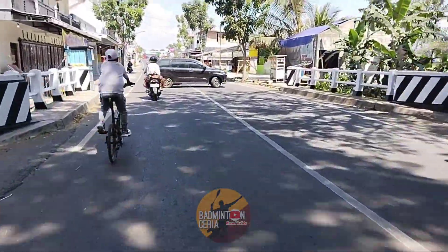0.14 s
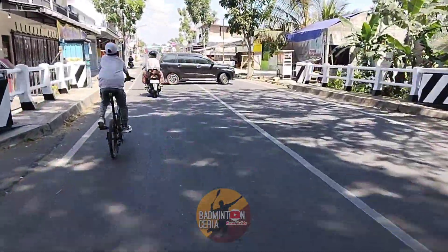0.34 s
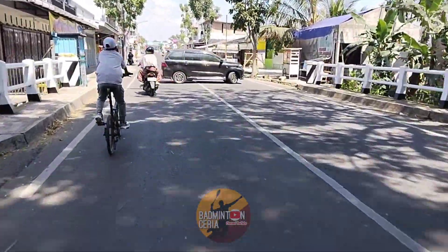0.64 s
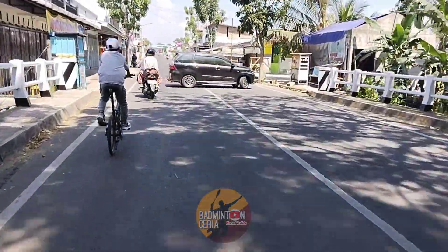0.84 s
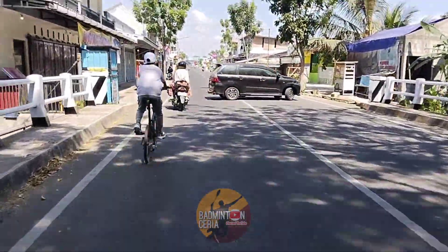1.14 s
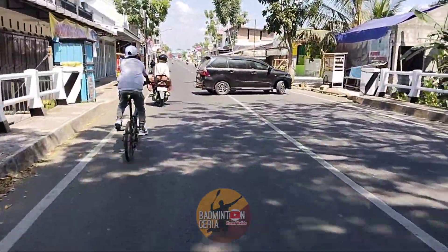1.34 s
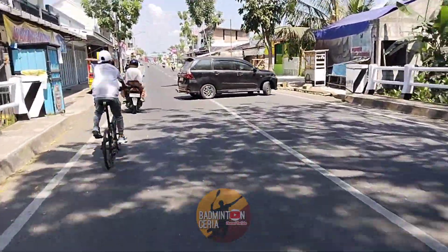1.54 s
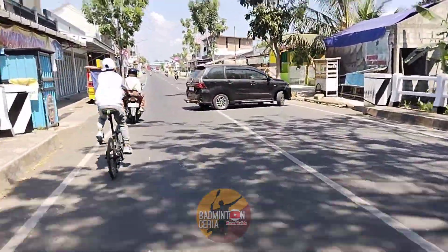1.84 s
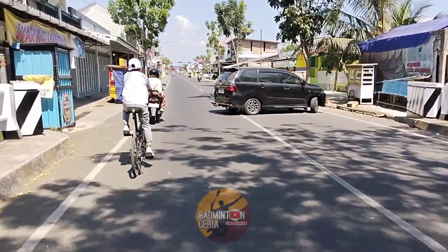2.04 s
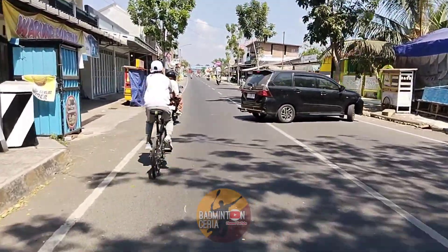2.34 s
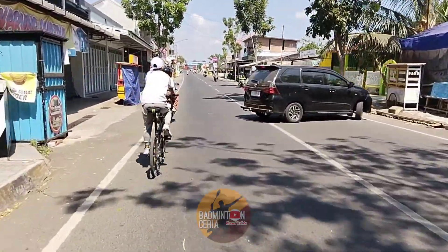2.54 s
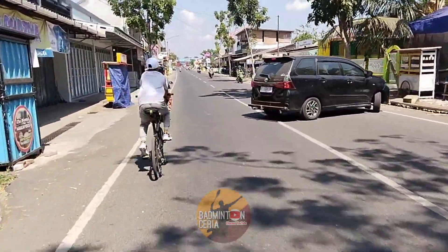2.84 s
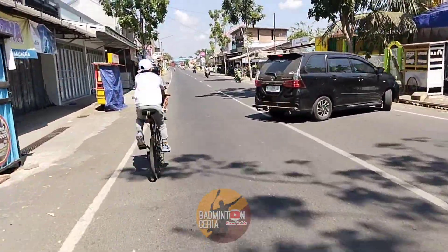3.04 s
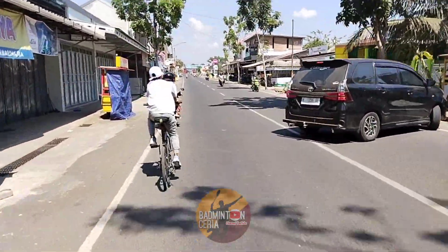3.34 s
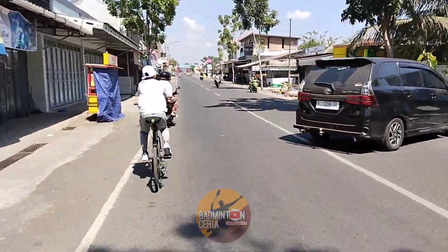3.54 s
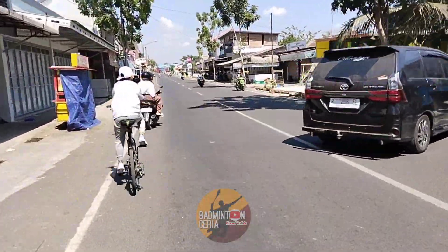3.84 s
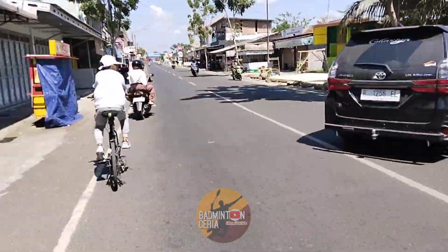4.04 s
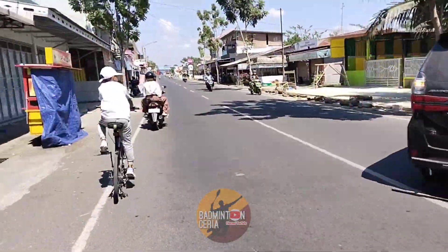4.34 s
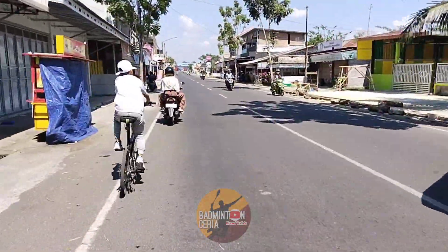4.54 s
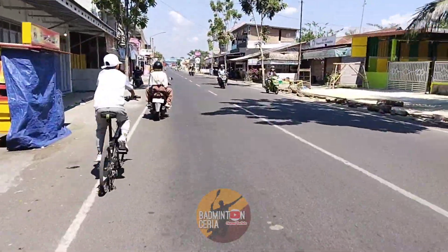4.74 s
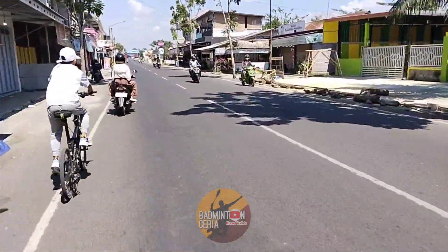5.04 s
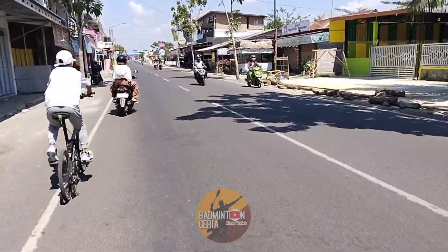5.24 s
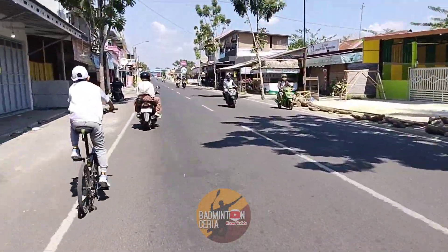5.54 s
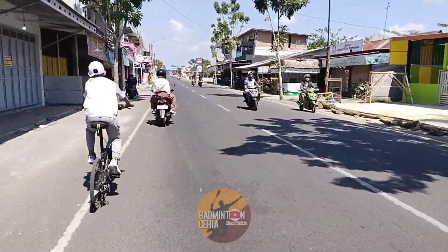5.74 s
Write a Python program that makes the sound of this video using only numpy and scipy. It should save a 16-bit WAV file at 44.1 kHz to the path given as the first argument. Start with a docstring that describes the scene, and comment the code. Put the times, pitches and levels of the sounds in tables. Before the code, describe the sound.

A bicycle bell is flicked seven times, clicking and pinging with a wavering high hum, over low gusty wind and murky street traffic.

```python
"""Wind on the microphone, traffic and a passing motorbike are heard first, all made of coloured noise.
Then a bicycle bell is flicked seven times while riding along a town street. Each flick gives a click,
a short piercing ping and a long beating hum, made of dying sines, pairs of waves and grainy noise.
Faint clinks, loose rattles and a dry tick join in; a bass cut, noise suppressor and band limit finish it."""
import sys
import numpy as np
from scipy import signal
from scipy.fft import rfft, irfft
from scipy.io import wavfile
from scipy.ndimage import uniform_filter1d

SR = 44100
rng = np.random.default_rng(int(sys.argv[2]) if len(sys.argv) > 2 else 0)


def put_to_file(sound):
    """Save the sound as 16-bit audio at rate SR, in the file named by the first command-line argument."""
    columns = np.atleast_2d(sound).T  # one column per channel
    safe = np.clip(columns, -1, 1)
    whole_steps = np.round(safe * 32767)
    wavfile.write(sys.argv[1], SR, whole_steps.astype(np.int16))


N = 260631
TIME = np.arange(N) / SR


def amp(db):
    """Turns decibels into gain."""
    return 10 ** (np.asarray(db) / 20)


def unit(x):
    """Scales a signal to an rms of one."""
    return x / np.sqrt(np.mean(x ** 2) + 1e-20)


def curve(rows, axis=1):
    """Reads one column of a time table at every sample, with straight lines between rows."""
    rows = np.asarray(rows)
    return np.interp(TIME, rows[:, 0], rows[:, axis])


def colour(points, hz):
    """Gain of a spectrum at the given frequencies."""
    point_hz, point_db = np.transpose(points)
    return amp(np.interp(np.log(hz + 1), np.log(point_hz), point_db))


def add(mix, s, sound):
    """Mixes a sound in at time s."""
    part = mix[round(s * SR):][:len(sound)]
    part += sound[:len(part)]


def drift(rate_hz):
    """A random wander of unit rms; a higher rate makes it faster."""
    step = 16  # worked out at every 16th sample, then joined by lines
    count = N // step + 2
    hz = np.fft.rfftfreq(count, step / SR)
    spectrum = rfft(rng.standard_normal(count)) * np.exp(-(hz / rate_hz) ** 2)
    slow = irfft(spectrum, count)
    return unit(np.interp(np.arange(N) / step, np.arange(count), slow))


def noise(points, patchy_db=0, size=1024):
    """Coloured noise whose level varies in small patches of time and pitch."""
    hop = size // 4
    hz = np.fft.rfftfreq(size, 1 / SR)
    real, imaginary, patches = rng.standard_normal((3, N // hop + 5, len(hz)))
    patches = uniform_filter1d(patches, size=13, axis=0)
    patches = unit(uniform_filter1d(patches, size=5, axis=1))
    patch_gain = amp(patchy_db * np.minimum(patches, 1.3))
    bins = (real + 1j * imaginary) * colour(points, hz) * patch_gain
    return unit(signal.istft(bins.T, nperseg=size, noverlap=size - hop)[1][:N])


def impulse(points, size=2048):
    """A click of peak one with the given spectrum, with no sound before its start."""
    log_gain = np.log(colour(points, abs(np.fft.fftfreq(size, 1 / SR))))
    # the Hilbert transform finds the phase that packs the energy early
    click = np.fft.ifft(np.exp(np.conj(signal.hilbert(log_gain)))).real
    return click / abs(click).max()


def mode(t, hz, t60, rise):
    """A sine with a soft start (rise in s) that dies by 60 dB in t60 seconds."""
    tone = np.sin(2 * np.pi * (hz * t + rng.random()))
    return tone * amp(-60 * t / t60) * (1 - np.exp(-t / rise))


def steady(x, size=4000):
    """Takes the slow swells out of a noise, so that one control can set its level."""
    return x / np.sqrt(uniform_filter1d(x ** 2, size=size) + 1e-9)


def fuzzy(hz, spread_hz):
    """A tone smeared over a narrow band by two random wanders."""
    phase = 2 * np.pi * np.cumsum(hz * np.ones(N)) / SR
    return unit(drift(spread_hz) * np.cos(phase) + drift(spread_hz) * np.sin(phase))


# slow rise and fall of the wind, before a shared trim: (time [s], level [dB])
BREEZE = [(0, -55.5), (.4, -41.5), (.65, -46.5), (1.0, -37.5), (1.35, -46.5), (1.7, -45.5), (2.1, -60.5),
          (2.3, -54), (2.7, -65), (3.3, -49), (3.5, -34.5), (3.85, -43.5), (4.55, -45), (4.85, -48),
          (5.05, -39), (5.91, -48)]
# single gusts that stand out of it, before the same trim: (time [s], level [dB], half length [s])
GUSTS = [(0.156, -42, 0.017), (0.345, -33, 0.045), (0.485, -37, 0.037), (0.853, -46, 0.031),
         (1.015, -55, 0.012), (1.144, -39.5, 0.027), (1.502, -40, 0.046), (2.186, -37, 0.028),
         (3.06, -44, 0.017), (3.449, -36.5, 0.021), (3.517, -40, 0.0051), (3.919, -35.5, 0.0092),
         (4.133, -35.5, 0.0068), (4.666, -33.5, 0.025), (4.861, -30, 0.082), (5.175, -35, 0.018),
         (5.361, -34.5, 0.015)]
# colour of the wind on the microphone: (pitch [Hz], gain [dB])
WIND = [(20, -36), (40, -32.5), (62, -43.5), (90, -11.5), (135, 16), (180, 2.5), (230, -18.5), (330, -47.5),
        (480, -42), (700, -52), (1200, -80.5)]
# thumps where gusts hit the microphone, before shaping: (time [s], level [dB], pitch [Hz])
BUFFETS = [(.985, -32, 231), (3.655, -39.5, 281), (4.655, -38, 365), (4.845, -24, 150), (4.86, -29.5, 440),
           (4.876, -35, 290), (5.31, -41, 337)]


def wind():
    """Eddies rumble on the microphone; stronger gusts reach higher, and some land in thumps."""
    power = amp(curve(BREEZE)) ** 2
    for s, db, half_s in GUSTS:
        power = power + amp(db) ** 2 * np.exp(-((TIME - s) / half_s) ** 2)
    gust_db = 10 * np.log10(power)
    low = steady(noise(WIND, patchy_db=0.0), size=2000)
    out = amp(gust_db - 3.5) * low * amp(3.36 * drift(rate_hz=31))
    eddies = steady(noise([(120, -24), (260, 24), (420, 5.5), (540, 8.5), (800, -63.5)], patchy_db=2.5))
    # the higher eddies grow 2.78 dB for each dB of wind
    out += amp(-63.5 + 2.78 * (gust_db + 39.0)) * eddies
    t = np.arange(SR // 10) / SR
    for s, db, hz in BUFFETS:
        swell = np.exp(-(t * hz / 3.5) ** 2) * (1 - np.exp(-(t * hz) ** 2))
        add(out, s, amp(db) * np.sin(2 * np.pi * hz * t) * swell)
    return out


# low rumble of the road: (pitch [Hz], gain [dB])
RUMBLE = [(20, 10.5), (45, 0), (90, -9.5), (160, -10), (400, -28), (900, -55)]
RUMBLE_DB = -65


def rumble():
    """The road rumbles faintly and without pause under the lulls in the wind."""
    return amp(RUMBLE_DB) * noise(RUMBLE, patchy_db=-0.5, size=2048)


# the passing motorbike: (time [s], exhaust level [dB], tyre level [dB])
PASS = [(0, -57, -61), (.25, -52, -63.5), (.4, -47.5, -68), (.6, -46.5, -60.5), (.74, -50, -55),
        (.9, -73, -56.5), (1.08, -70, -61), (1.2, -83, -72), (1.7, -90, -83.5), (2.3, -110, -110)]
# colour of its exhaust: (pitch [Hz], gain [dB])
EXHAUST = [(70, -54), (250, -6), (450, -16), (600, -3.5), (800, 4), (1100, 8), (1700, 6), (2050, -0.5),
           (2400, -9), (3300, -8), (4200, -11), (5200, -21.5), (7000, -36.5), (9600, -15.5), (11400, -39),
           (15500, -36)]
# colour of its tyres: (pitch [Hz], gain [dB])
TYRES = [(700, -35.5), (1300, 3.5), (2100, -2.5), (2500, -8), (3100, 1), (4200, -13.5), (5500, -22),
         (9500, -18), (15000, -25.5)]
FIRING_HZ = 91  # middle of the engine's wavering pulse rate
# echo off the road: when the bike is nearest, half length of the pass, longest delay, strength 0-1
NEAREST_S, PASS_HALF_S, GROUND_DELAY_S, GROUND_ECHO = .52, 0.53, 0.001112, 0.16


def motorbike():
    """Pulsing exhaust noise swells and drops away, tyre hiss follows; a road echo sweeps through both."""
    turns = np.cumsum(FIRING_HZ * (1 + .06 * drift(rate_hz=20))) / SR
    firing = unit(1.2 + np.exp(-(turns % 1) / .3))
    exhaust = amp(curve(PASS)) * firing * steady(noise(EXHAUST, patchy_db=4, size=1024))
    tyres = amp(curve(PASS, axis=2)) * noise(TYRES, patchy_db=5)
    direct = (exhaust + tyres) * amp(0.69 * drift(rate_hz=7.3))
    delay_s = GROUND_DELAY_S / np.hypot(1, (TIME - NEAREST_S) / PASS_HALF_S)
    return direct + GROUND_ECHO * np.interp(TIME - delay_s, TIME, direct)


WHINE_WAVER_HZ = 14  # rms wander of the pitch


def whine(s, half_s, hz, glide_hz_per_s, spread_hz, db):
    """A smeared, wavering tone that swells and fades as its vehicle goes by."""
    since = TIME - s
    glide = glide_hz_per_s * np.clip(since, -2 * half_s, 2 * half_s)
    pitch = hz + glide + WHINE_WAVER_HZ * drift(rate_hz=8.56)
    swell = amp(db + 3.3 * drift(rate_hz=14)) / (1 + (since / half_s) ** 2 / 2) ** 2
    return swell * steady(fuzzy(pitch, spread_hz), size=3000)


# traffic further off, before trims: (time [s], lower band level [dB], upper band level [dB])
TRAFFIC = [(1.1, -70.5, -80), (1.5, -62.5, -85), (1.85, -68, -74.5), (2.1, -65.5, -69), (2.6, -63.5, -72.5),
           (2.8, -58.5, -73.5), (2.93, -70, -75.5), (3.07, -55, -76.5), (3.18, -52, -71.5),
           (3.6, -56.5, -64), (3.72, -52, -62.5), (3.85, -57, -63), (4.1, -48.5, -64.5), (4.19, -64.5, -64),
           (4.3, -54, -52.5), (4.5, -52, -56.5), (4.88, -72, -66.5), (5.0, -59, -59.5), (5.15, -51, -56.5),
           (5.5, -59, -52.5), (5.65, -80.5, -47.5), (5.91, -59.5, -54.5)]
# colour of the lower band: (pitch [Hz], gain [dB])
TRAFFIC_LOW = [(200, -33), (380, -6.5), (520, -7.5), (660, -1), (810, -11.5), (1000, -8), (1200, 3),
               (1380, -10), (1700, -76)]
# colour of the upper band: (pitch [Hz], gain [dB])
TRAFFIC_HIGH = [(1100, -6), (1420, 0.5), (1650, 0.5), (2050, -9), (2600, -22), (3100, -10.5), (4000, -16.5),
                (5200, -63)]
# whines and drones of vehicles that come and go:
# (loudest at [s], half length [s], pitch [Hz], glide [Hz per s], spread [Hz], level [dB])
WHINES = [(0.14, .52, 1173, -200, 40, -61.5), (1.775, .07, 641, -380, 29.8, -60),
          (3.003, .04, 479, -200, 44.7, -61), (3.132, .09, 376, -60, 22, -54.5),
          (3.415, .04, 664, -300, 44.5, -57), (3.54, .08, 1093, -100, 34.8, -61),
          (3.8, .06, 395, -1, 41.8, -56), (3.907, .17, 1165, 59.5, 35, -55.5),
          (4.543, .42, 1626, -39.5, 29.5, -60.5), (5.038, .05, 435, 103.5, 55, -51.5),
          (5.051, .11, 1222, -200, 35, -57), (5.308, .05, 522, 302, 70, -61.5),
          (5.443, .44, 1664, -1, 24, -58.5)]
# fine tyre hiss, before a trim: (time [s], level [dB])
HISS_LEVEL = [(0, -60), (.75, -60.5), (1.2, -68.5), (2.1, -69), (3, -64), (4.9, -69), (5.6, -61.5),
              (5.9, -66.5)]
# its colour: (pitch [Hz], gain [dB])
HISS = [(2500, -42.5), (4200, -39.5), (5200, -17), (6400, -4.5), (8000, -1.5), (9600, 5), (10700, 1),
        (12300, -9), (15300, -8)]


def street():
    """Two bands of patchy noise make murky traffic, with wavering whines and a fine hiss above."""
    low = steady(noise(TRAFFIC_LOW, patchy_db=6.5, size=2048))
    low = amp(curve(TRAFFIC) - 4.0) * low * amp(2.2 * drift(rate_hz=8))
    high = steady(noise(TRAFFIC_HIGH, patchy_db=7, size=2048))
    high = amp(curve(TRAFFIC, axis=2) - 4.5) * high * amp(1.9 * drift(rate_hz=9.9))
    tones = sum(whine(*row) for row in WHINES)
    hiss = amp(curve(HISS_LEVEL) - 3.5) * noise(HISS, patchy_db=4, size=2048)
    return low + high + tones + hiss


# faint, distant clinks: (time [s], level [dB], pitch [Hz])
CLINKS = [(1.974, -45.5, 1237), (2.06, -50, 1840)]
CLINK_T60 = 0.067  # s to fall by 60 dB


def clinks():
    """Small things knock and ring briefly somewhere down the street, each as one dying sine."""
    t, out = np.arange(SR // 3) / SR, np.zeros(N)
    for s, db, hz in CLINKS:
        add(out, s, amp(db) * mode(t, hz, CLINK_T60, rise=0.0048))
    return out


# time the bounces last, and the greatest strength of one against the first blow
CHATTER_S, BOUNCE = .012, 0.35


def chatter(count=4):
    """The striker lands, then bounces a few times at uneven moments."""
    contacts = np.zeros(SR // 20)
    contacts[0] = 1
    for when, size in rng.random((count, 2)):
        bounce = BOUNCE * (.5 + size / 2) * rng.choice([-1, 1])
        add(contacts, when * CHATTER_S, np.array([bounce]))
    return contacts


# short modes of the housing and lever, varied each time: (pitch [Hz], level [dB], time to fall 60 dB [s])
HOUSING = [(970, -5, 0.024), (1430, 1, 0.047), (1740, -7, 0.02), (2157, -4.5, 0.062), (2890, -7, 0.069),
           (3253, 1, 0.032), (4400, -6, 0.054), (4620, -12, .11), (5280, -13, .035)]


def housing(t):
    """The short modes of the housing, stirred a little differently each time."""
    out = np.zeros(len(t))
    for hz, db, t60 in HOUSING:
        strength = amp(db + 2.5 * rng.standard_normal())
        out += strength * mode(t, hz * rng.uniform(.99, 1.01), t60, rise=.0004)
    return out


PING_HZ = 9455


def ping(t, beat_s, return_s, second_db, swell_s=0.0072, fall_s=0.06):
    """The piercing mode holds for one beat, sinks, and swells back once, a little off pitch."""
    first = np.maximum(1 - (t / beat_s) ** 4, 0) * np.exp(-t / fall_s) * 1.1
    u = np.maximum(t - return_s, 0) / swell_s
    second = amp(second_db) * u * np.exp(1 - u)
    second_hz = PING_HZ + rng.uniform(-8, 8)
    return first * np.sin(2 * np.pi * PING_HZ * t) + second * np.cos(2 * np.pi * second_hz * t)


# one row a flick: (time [s], click level [dB], ping level [dB], length of the ping's first beat [s],
# start of its second beat [s], second beat against the ping [dB], top mode level [dB], thump level [dB],
# thump pitch [Hz], thump lag [s], thump half length [s], crackle level [dB], clatter level [dB])
FLICKS = [(2.2399, -20.5, -25, 0.025, 0.021, -6, -49, -32.5, 696, .0071, .0027, -44.5, -52.5),
          (2.5653, -22, -21.5, 0.013, 0.0089, -8.5, -42, -30, 679, .0060, .0028, -55, -52.5),
          (2.8557, -37.5, -24, 0.01, 0.021, -13, -45.5, -35, 520, 0.0019, 0.0023, -72, -51.5),
          (3.229, -21, -20, .008, .009, -8.5, -55, -31, 772, .0016, .0017, -52, -47),
          (3.6377, -27, -21, .014, .009, -19, -57, -35.5, 649, .0031, .0025, -52, -50),
          (4.1297, -22, -26.5, 0.014, 0.014, 2, -35, -34.5, 671, 0.0077, 0.0049, -52, -48.5),
          (5.3905, -28, -26, 0.011, 0.0089, -4.5, -40, -33.5, 420, 0.00107, 0.0024, -48.5, -50)]
# faint clicks just before or after a flick: (time [s], level [dB])
FAINT_CLICKS = [(2.2369, -34.5), (2.575, -37), (4.126, -36.5), (4.158, -42.5)]
# colour of the striker's click: (pitch [Hz], gain [dB])
CLICK = [(150, -21), (600, 8), (1400, -18.5), (2600, -19), (4500, -7), (6000, -14.5), (8000, 5.5),
         (9400, 8.5), (11000, 0.5), (13000, 7), (15000, -2), (15800, -11.5)]
# colour of the striker's buzz on the dome: (pitch [Hz], gain [dB])
RATTLE = [(1500, -18.5), (2600, -15), (4500, -20.5), (6000, -26), (8200, -9.5), (9400, 13.5), (10300, -5.5),
          (11500, -18.5), (15000, -10)]
# colour of the street's answer: (pitch [Hz], gain [dB])
ECHO = [(3000, -20), (4000, -26.5), (4550, -24), (5200, -29.5), (7000, -34.5), (9000, -16.5), (9400, -1),
        (9650, 6), (9900, -19.5), (11000, -35.5), (14200, -22.5), (14950, -25), (15400, -43.5)]
# colour of the rough crackle under each ping: (pitch [Hz], gain [dB])
CRACKLE = [(200, -3.5), (420, -5.5), (900, 17.5), (1450, 12), (1850, -22), (2500, -18), (3800, -11),
           (4500, -3), (5600, -28), (8000, -28)]
CRACKLE_S = 0.013  # length of its strong part
TOP_HZ, MIDDLE_HZ = 14640, 7148
MIDDLE_DB = -20  # against the crackle level
BOUNCE_CLICK_DB = -23.5  # against the click level


def flicks():
    """The striker clicks and chatters, high modes flash up and the housing clatters.
    Under each ping lie a low thump and rough crackle, as of an overloaded microphone."""
    t, out = np.arange(SR) / SR, np.zeros(N)
    buzzing, echoing, crackling = np.zeros((3, N))
    click, short = impulse(CLICK), t[:SR // 5]
    for (s, click_db, ping_db, beat_s, return_s, second_db, top_db,
         thump_db, thump_hz, thump_lag_s, thump_s, crackle_db, clatter_db) in FLICKS:
        contacts = chatter()
        add(out, s, amp(click_db) * click)
        add(out, s, amp(click_db + BOUNCE_CLICK_DB) * signal.fftconvolve(contacts, click))
        add(out, s, amp(clatter_db) * signal.fftconvolve(contacts, housing(short)))
        add(out, s, amp(ping_db) * ping(t, beat_s, return_s, second_db))
        add(out, s, amp(top_db) * mode(t, TOP_HZ, t60=.2, rise=.014))
        add(out, s, amp(crackle_db + MIDDLE_DB) * mode(t, MIDDLE_HZ, t60=.9, rise=.001))
        thump_swell = np.exp(-((t - thump_lag_s) / thump_s) ** 2)
        add(out, s, amp(thump_db) * thump_swell * np.sin(2 * np.pi * thump_hz * t))
        add(out, s, amp(thump_db - 25) * mode(t, thump_hz, t60=.2, rise=.005))
        # the crackle holds briefly and leaves a faint tail
        crackle = np.exp(-(t / CRACKLE_S) ** 6) + amp(-20) * np.exp(-t / .025)
        add(crackling, s, amp(crackle_db) * crackle)
        # the striker buzzes against the dome for about as long as the ping's first beat, then fades
        contact = np.exp(-(t / (beat_s + 0.012)) ** 2) + amp(second_db) * np.exp(-t / 0.019)
        add(buzzing, s, amp(-40.5) * contact + amp(click_db - 2.5) * np.exp(-t / 0.00019))
        echo = np.exp(-t / 0.075) * (1 - np.exp(-t / 0.0028))
        add(echoing, s, amp(-50.5 + 0.39 * (second_db + 10.0)) * echo)
    for s, db in FAINT_CLICKS:
        add(out, s, amp(db) * click)
        add(out, s, amp(db - 14.5) * housing(short))
    grain = unit(amp(3.5 * drift(rate_hz=250)))
    rough = buzzing * noise(RATTLE, patchy_db=4, size=512)
    rough += crackling * noise(CRACKLE, patchy_db=5, size=1024)
    return out + grain * rough + echoing * noise(ECHO, patchy_db=5, size=512)


# the hum before its beating: (time [s], level [dB])
HUM_LEVEL = [(2.25, -42.5), (2.31, -54.5), (2.38, -44), (2.55, -50.5), (2.58, -39.5), (2.7, -37.5),
             (2.81, -39), (2.86, -44), (2.98, -31), (3.13, -39.5), (3.24, -39), (3.44, -40), (3.53, -47.5),
             (3.62, -40.5), (3.69, -43.5), (3.77, -40.5), (3.98, -44), (4.12, -50.5), (4.14, -37.5),
             (4.18, -47.5), (4.26, -48), (4.41, -47.5), (4.58, -54), (4.9, -60.5), (5.1, -63), (5.38, -60),
             (5.4, -43.5), (5.54, -33.5), (5.69, -38.5), (5.91, -40)]
# moments at which a second wave opposes the hum, wholly, partly or not at all:
# (time [s], strength of that wave [0-1])
HUM_DIPS = [(2.225, 1), (2.28, 0.8), (2.345, 0.7), (2.54, 0.47), (2.645, .85), (2.765, 0.1), (2.832, .95),
            (2.888, 0.74), (3.165, 0.8), (3.3, 0.6), (3.378, 0.7), (3.495, 0.77), (3.62, 0), (3.715, 0.78),
            (3.835, .95), (4.055, 0.5), (4.2, 0), (4.35, 1), (4.535, .7), (4.64, 0.9), (4.84, 0.7),
            (4.97, .8), (5.17, 0.8), (5.36, 0), (5.475, 0.9), (5.648, 0.75), (5.76, 0.66), (5.895, 0.2),
            (6.0, 0.5)]
HUM_HZ = 3442
DOPPLER = 1.021  # echoes from ahead come back sharp


def hum():
    """The lowest mode rings on, two waves beating unevenly as the bicycle moves; street echoes flutter."""
    ring = amp(curve(HUM_LEVEL)) * np.clip((TIME - FLICKS[0][0]) / .002, 0, 1)
    # the two waves turn apart by one full turn from row to row
    dip_count = np.interp(TIME, np.asarray(HUM_DIPS)[:, 0], np.arange(len(HUM_DIPS)))
    apart = np.exp(1j * np.pi * dip_count)
    pair = ring * (apart - np.clip(curve(HUM_DIPS), 0, 1) / apart) / 2
    direct = (pair * np.exp(2j * np.pi * HUM_HZ * TIME)).real * amp(.6 * drift(rate_hz=60))
    around = uniform_filter1d(ring, size=12000)
    scatter = amp(-28) * around * fuzzy(HUM_HZ, spread_hz=45)
    ahead = amp(-27) * around * fuzzy(DOPPLER * HUM_HZ, spread_hz=18)
    return direct + scatter + ahead


# short rattles in the traffic, before their rise: (time [s], level [dB], fade [s])
RATTLES = [(3.034, -60, 0.061), (4.243, -44, 0.063)]
# their colour: (pitch [Hz], gain [dB])
LOOSE = [(400, -26), (800, -1), (1250, 1.5), (1550, 0.5), (1800, 7), (2200, -2), (2700, -27.5), (4200, -26),
         (6000, -32)]
RATTLE_RISE_S = 0.012


def rattles():
    """Loose parts on passing vehicles shake in short bursts of grainy noise."""
    level = np.zeros(N)
    for s, db, fade_s in RATTLES:
        age = np.maximum(TIME - s, 0)
        level += amp(db) * (1 - np.exp(-age / RATTLE_RISE_S)) * np.exp(-age / fade_s)
    grain = unit(amp(2.5 * drift(rate_hz=110)))
    return level * grain * steady(noise(LOOSE, patchy_db=-3.5, size=512), size=1500)


TICK_S = 5.635  # when it starts


def tick():
    """A faint, dry tick from the bicycle: a very short burst of noise."""
    age = np.maximum(TIME - TICK_S, 0)
    burst = amp(-56) * np.exp(-age / .014) * (1 - np.exp(-age / .002))
    return burst * noise([(300, -10), (650, 10), (1500, 0), (5000, -8), (9500, 0), (15000, -5)])


def scene():
    """The bell close by, in the wind and the street."""
    background = wind() + rumble() + motorbike() + street()
    return (background + clinks() + flicks() + hum() + rattles() + tick())[None]


# floor of the noise suppressor's gain: (pitch [Hz], lowest gain [dB])
SUPPRESSION = [(60, -16.5), (300, 3.5), (2000, -13), (5000, 0), (7000, -12.5), (10000, -2.5)]


def suppress(x, size=1024):
    """Noise suppressor: bins weak against their running average are turned down, leaving a watery murk."""
    overlap = size - size // 4
    hz, _, bins = signal.stft(x, SR, nperseg=size, noverlap=overlap)
    power = uniform_filter1d(abs(bins) ** 2, size=5, axis=-1)
    power = uniform_filter1d(power, size=2, axis=-2)
    level_db = 10 * np.log10(power.clip(1e-16))
    average_db = uniform_filter1d(level_db, size=45, axis=-1)
    average_db = uniform_filter1d(average_db, size=5, axis=-2)
    # sounds well above the usual level are not turned down
    usual_db = np.median(average_db, axis=-1, keepdims=True)
    threshold_db = np.minimum(average_db + 1, usual_db + 6)
    gain = amp(np.minimum(1.6 * (level_db - threshold_db), 0))
    # the floor is above 0 dB around 300 Hz, so it lifts that region
    gain = np.maximum(gain, colour(SUPPRESSION, hz)[:, None])
    return signal.istft(bins * gain, nperseg=size, noverlap=overlap)[1][..., :N]


EDGE_HZ = 15600  # upper band limit


def record(dry):
    """The camera's bass cut against wind, its noise suppressor and its band limit."""
    bass_cut = signal.butter(3, 74, "highpass", fs=SR, output="sos")
    thinned = signal.sosfilt(bass_cut, dry)
    band_limit = signal.firwin(401, EDGE_HZ, window=("kaiser", 8), fs=SR)
    return signal.oaconvolve(suppress(thinned), band_limit[None], "same")


dry = scene()
out = record(dry)
put_to_file(out)
```